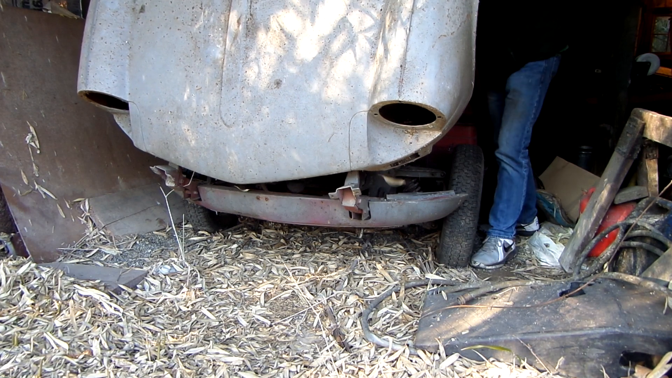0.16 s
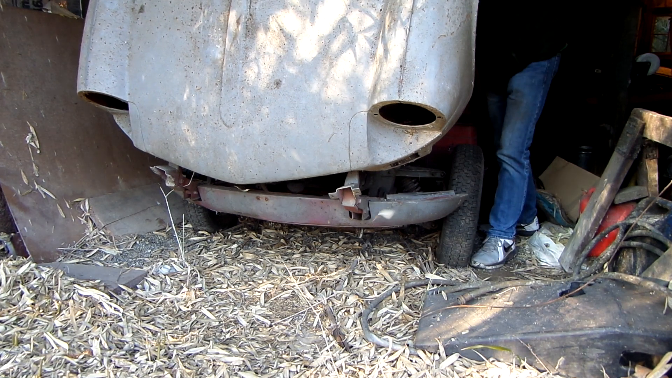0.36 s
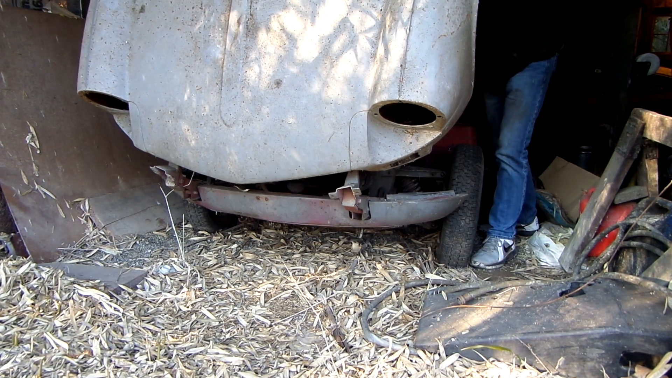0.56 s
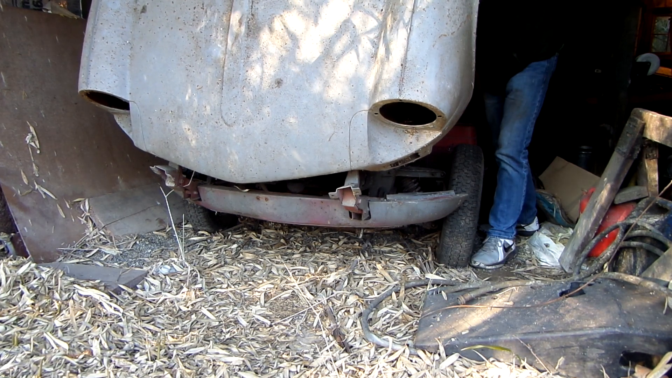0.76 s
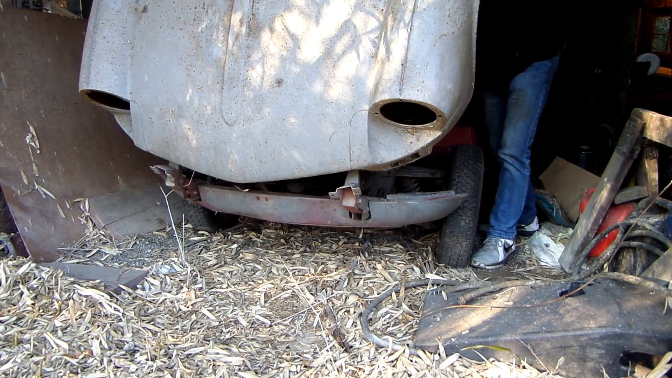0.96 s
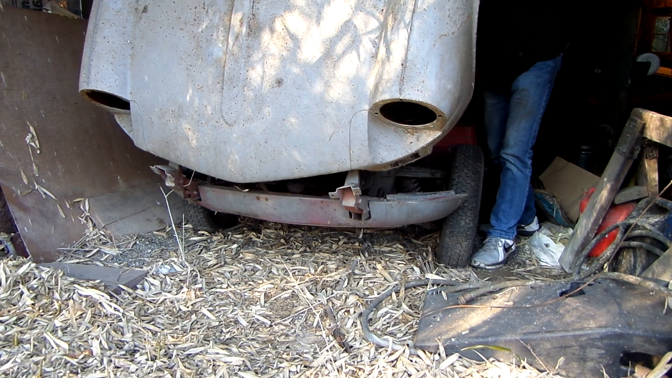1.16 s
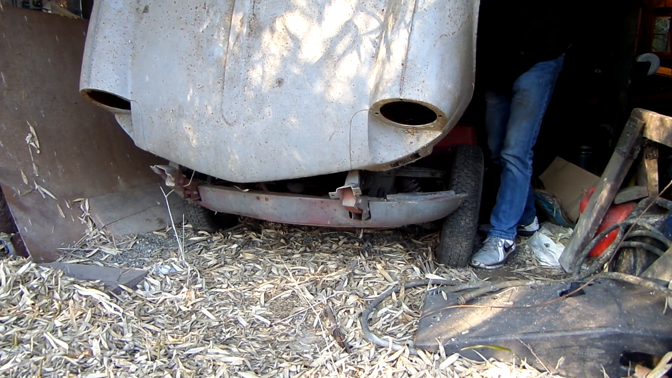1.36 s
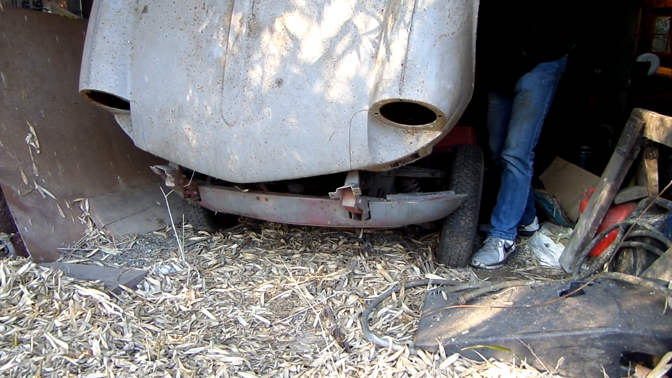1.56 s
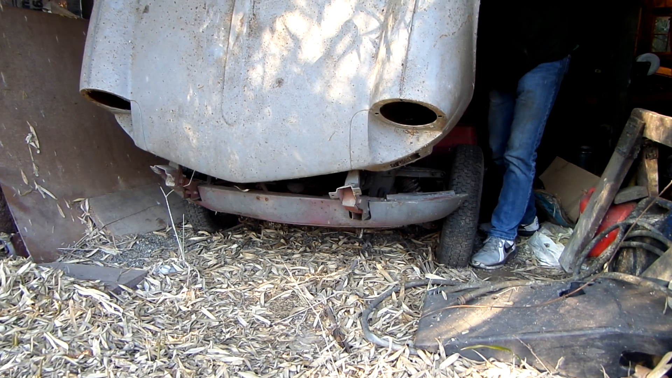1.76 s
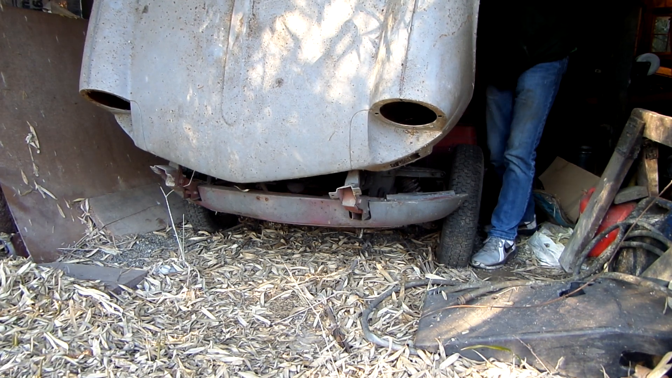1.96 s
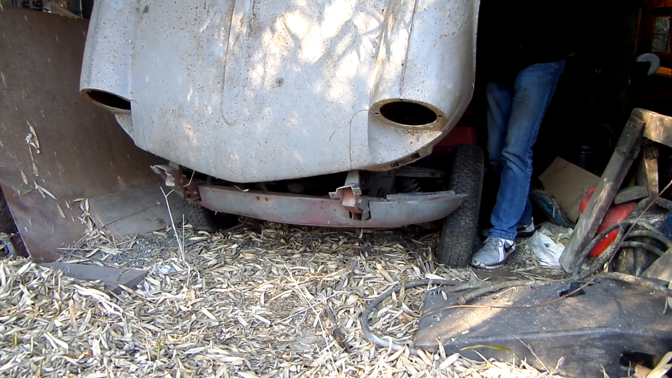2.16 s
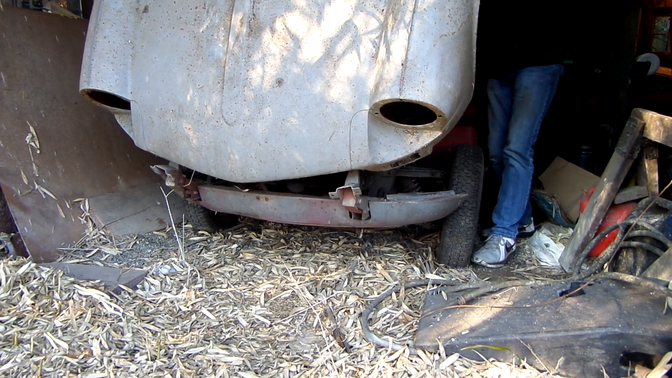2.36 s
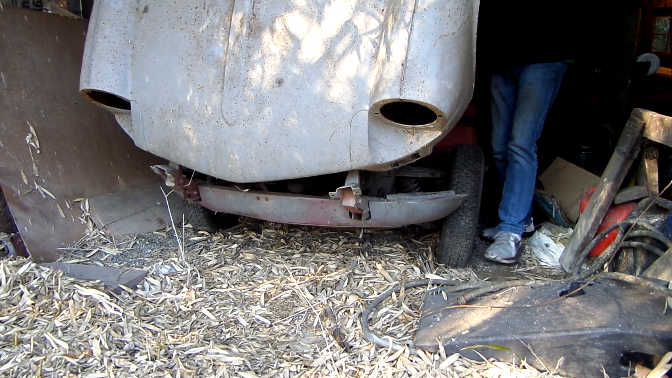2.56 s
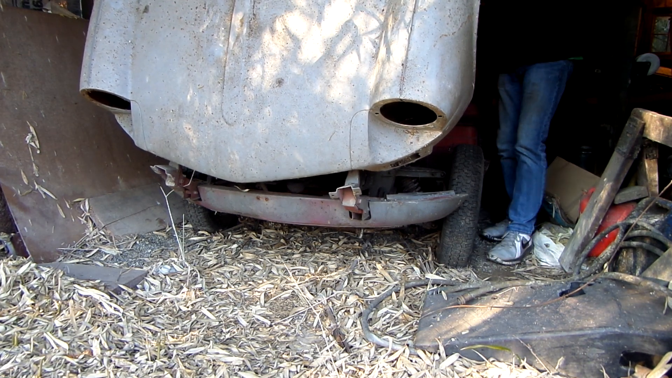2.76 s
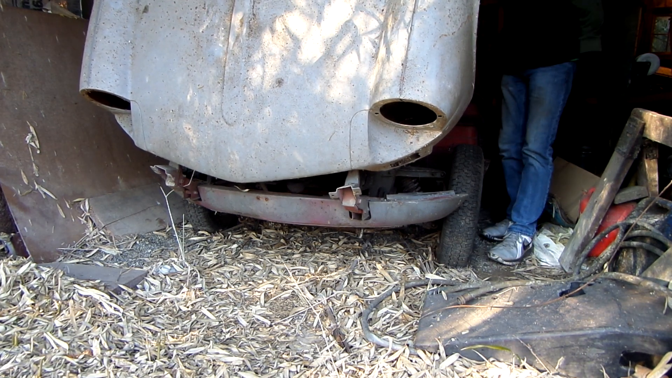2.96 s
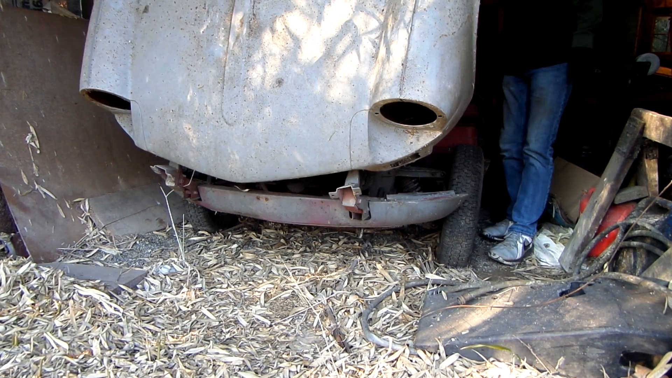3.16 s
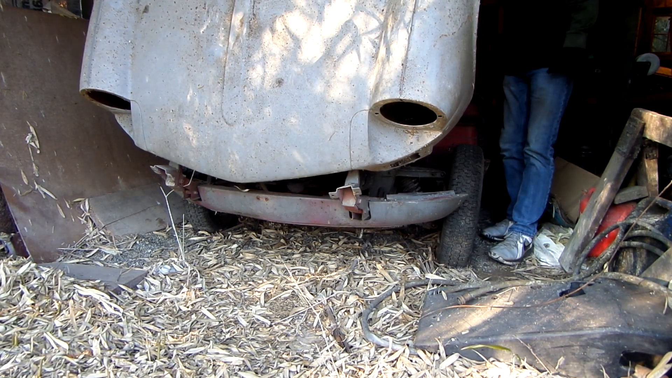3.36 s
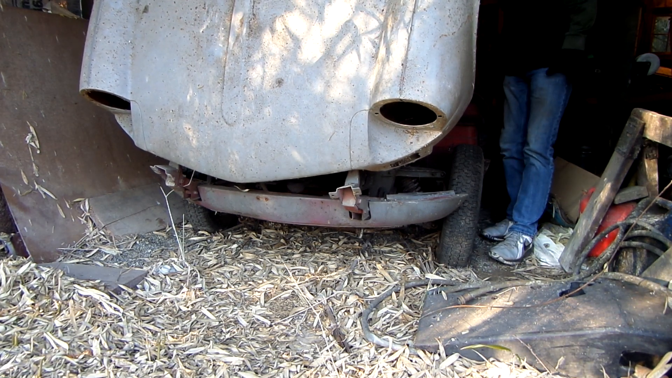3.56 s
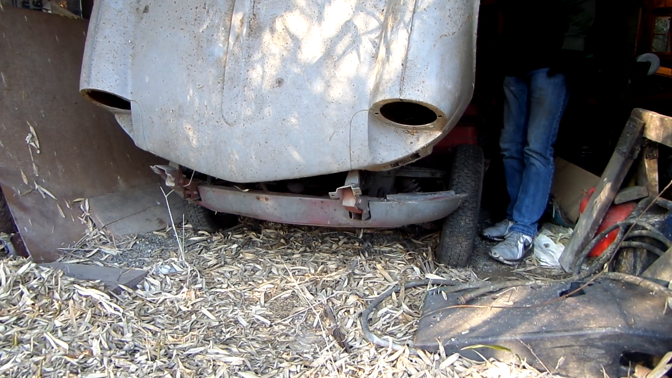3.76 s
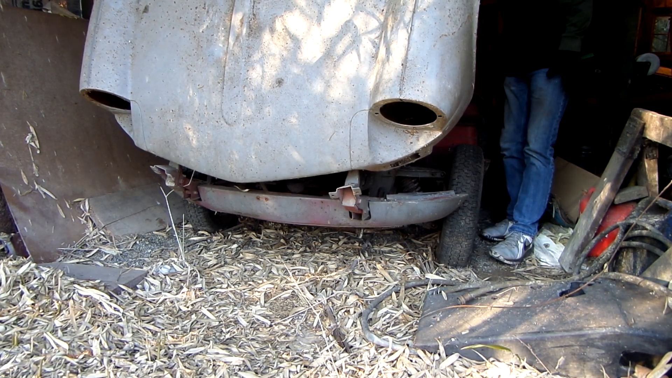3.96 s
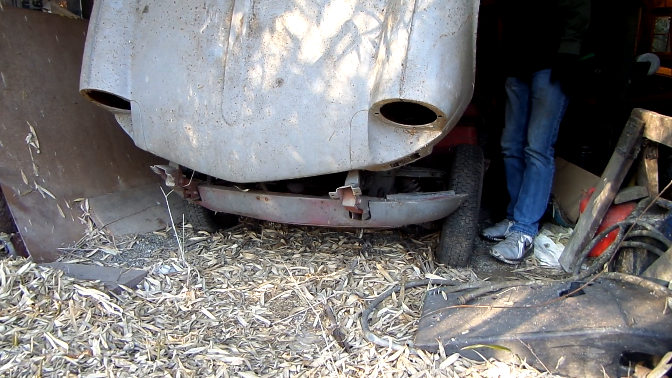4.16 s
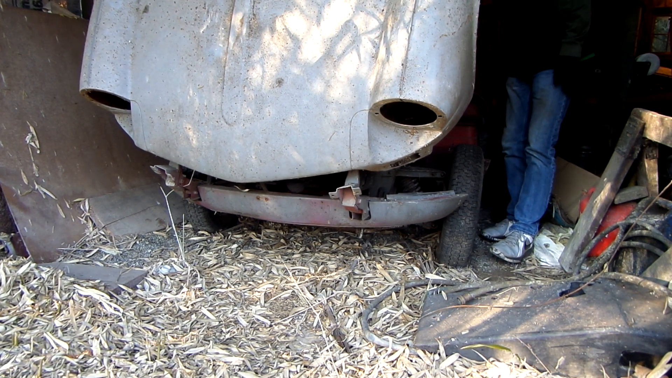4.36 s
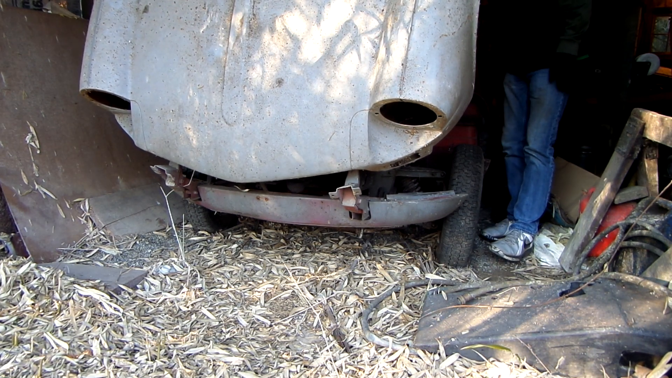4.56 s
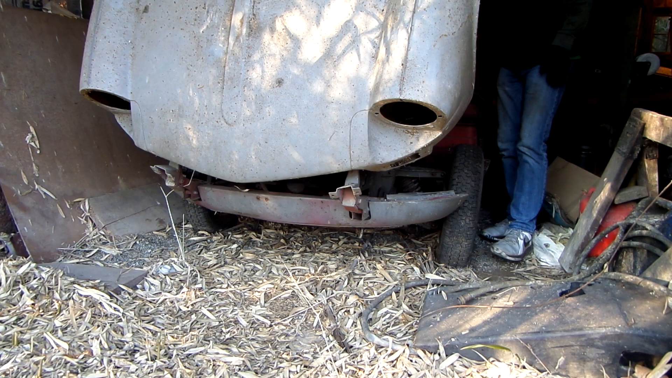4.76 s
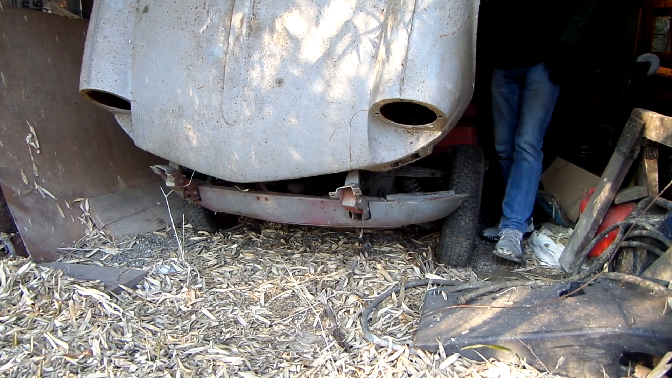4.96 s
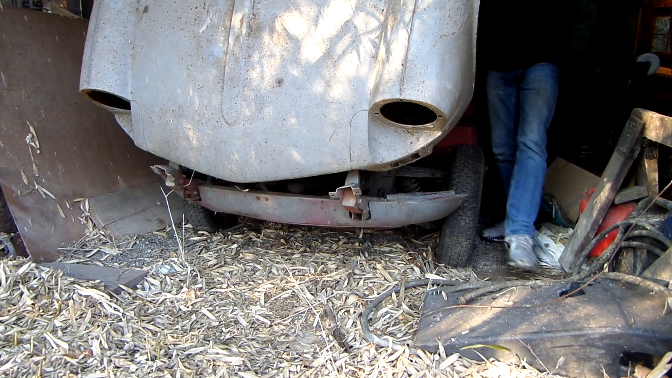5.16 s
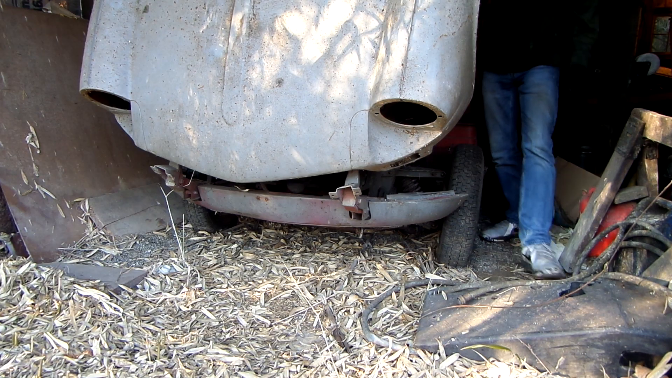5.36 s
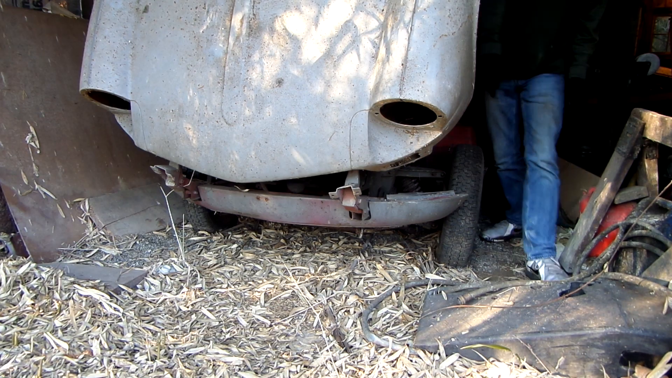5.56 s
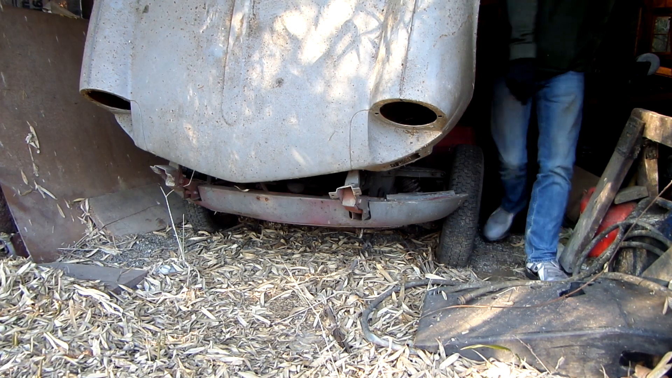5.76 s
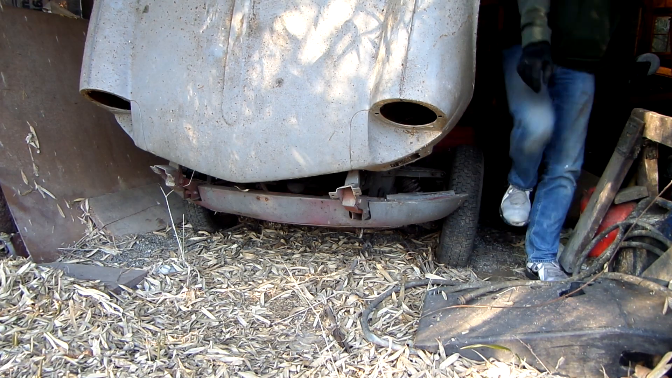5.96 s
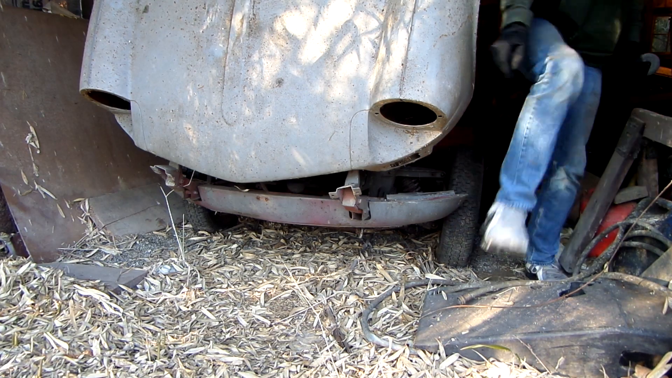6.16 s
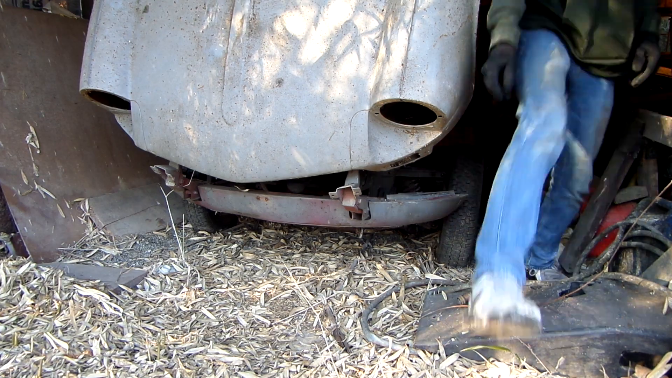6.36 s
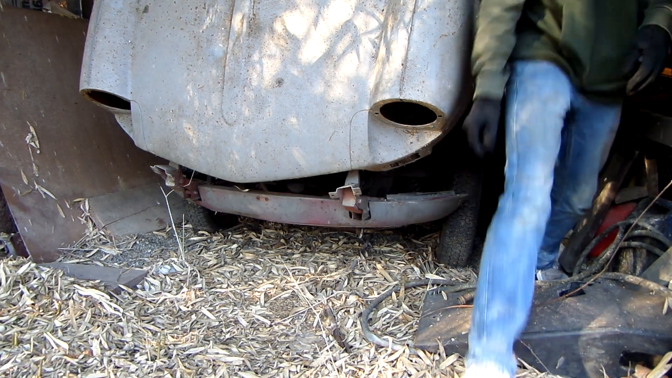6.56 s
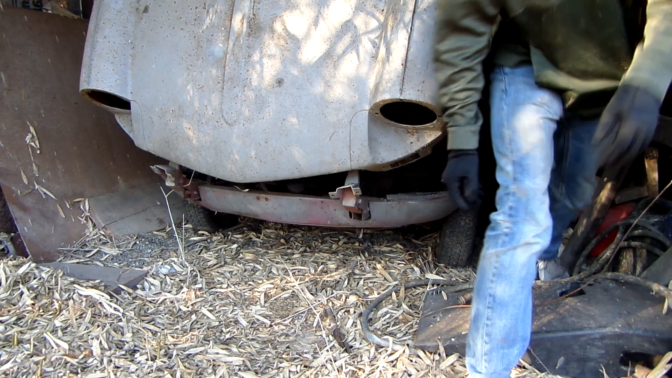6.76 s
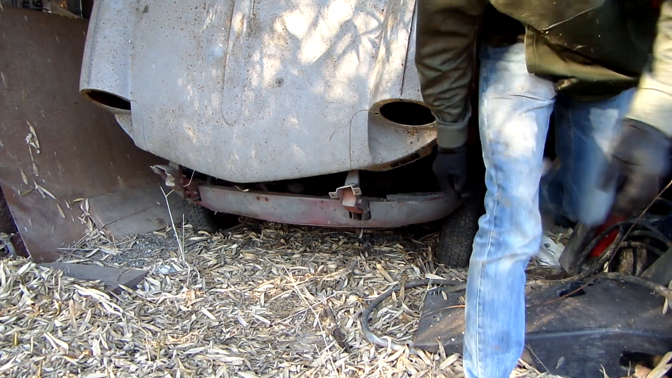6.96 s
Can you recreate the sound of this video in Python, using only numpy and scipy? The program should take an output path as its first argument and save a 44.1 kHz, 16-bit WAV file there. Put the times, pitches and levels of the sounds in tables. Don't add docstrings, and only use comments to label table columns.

```python
import sys
import numpy as np
from scipy import signal
from scipy.fft import rfft, irfft, next_fast_len
from scipy.io import wavfile
from scipy.ndimage import uniform_filter1d

SR = 44100
rng = np.random.default_rng(int(sys.argv[2]) if len(sys.argv) > 2 else 0)


def elevation(decibels):
    levels = np.asarray(decibels, float)
    return 10 ** (levels / 20)


def transcribe(u):
    v = np.clip(np.atleast_2d(u).T, -1, 1)
    q = np.round(v * 32767).astype(np.int16)
    wavfile.write(sys.argv[1], SR, q)


N = 312889


def rms_one(x):
    return x / np.sqrt(np.mean(x ** 2) + 1e-20)


def in_time(rows):
    s, *columns = np.transpose(rows)
    return [np.interp(np.arange(N) / SR, s, c) for c in columns]


def band(x, low_hz, high_hz, order=2):
    edges = np.clip([low_hz, high_hz], 10, .45 * SR)
    return signal.sosfilt(signal.butter(order, edges, "band", fs=SR, output="sos"), x)


def colour(x, spectrum):
    hz, db = np.transpose(spectrum)
    size = next_fast_len(N, real=True)
    grid = np.maximum(np.arange(size // 2 + 1) * SR / size, 1)
    gain = elevation(np.interp(np.log(grid), np.log(hz), db))
    return rms_one(irfft(rfft(x, size) * gain, size)[:N])


def drift(rate_hz):
    r = np.exp(-2 * np.pi * rate_hz / SR)
    wander = signal.lfilter([1], [1, -2 * r, r * r], rng.standard_normal(N + SR))
    return rms_one(wander[SR:])


def dying(t60, size):
    return rng.standard_normal(size) * elevation(-60 * np.arange(size) / SR / max(t60, .001))


def add(out, s, burst, peak_db):
    i = round(s * SR)
    out[i:i + len(burst)] += (burst * elevation(peak_db) / np.abs(burst).max())[:N - i]


def grains(per_s, spread_db, t60, clump_db, bed_db):
    born = rng.random(N) < per_s * elevation(clump_db * drift(25)) / SR
    sizes = elevation(spread_db * np.minimum(rng.exponential(1, N), 4)) * born
    power = signal.lfilter([1], [1, -elevation(-120 / (t60 * SR))], sizes ** 2 + 1e-18)
    return rng.standard_normal(N) * np.sqrt(power / power.mean() + elevation(2 * bed_db))


def tread():
    # time in seconds, stirring of the leaves in dB, pressure of the soles in dB
    steps = [(0.0, -47, -57), (0.28, -46.5, -61.5), (0.38, -44, -59), (0.5, -56.5, -63.5),
             (0.86, -60.5, -64.5), (1.12, -56.5, -63), (1.42, -64, -64.5), (2.6, -66.5, -62.5),
             (2.78, -51, -57.5), (2.88, -64.5, -64.5), (4.24, -69.5, -65.5), (4.5, -62.5, -61),
             (4.8, -68, -64.5), (5.57, -63, -63), (6.4, -61.5, -62.5), (6.43, -48, -49.5),
             (6.66, -55.5, -63), (7.09, -60.5, -63.5)]
    # pitch in Hz, strength in dB per Hz
    rustle = [(4120, -36), (7000, -15.5), (15100, -2), (16000, 11.5), (16500, -12)]
    crunch = [(2500, -30), (4000, 0), (9000, -3.5), (12000, -18.5)]
    scuff = [(500, -7), (900, -6.5), (2400, -8), (3500, -16), (5500, -27)]
    weight = [(80, -39), (150, 1), (430, -1.5), (900, -2.5), (1500, -15.5)]
    stir_db, press_db = in_time(steps)
    crunch_db = -68 + 0.58 * (stir_db + 64.5)
    weight_db = -63 + 0.43 * (press_db + 64)
    levels = (stir_db, crunch_db, press_db, weight_db)
    layers = (colour(grains(per_s=250.0, spread_db=4.0, t60=0.006, clump_db=6.0, bed_db=3.5), rustle),
              colour(grains(per_s=780.0, spread_db=1.0, t60=0.036, clump_db=-4.0, bed_db=-4.5), crunch),
              colour(grains(per_s=380.0, spread_db=2.5, t60=.03, clump_db=1.5, bed_db=-1.2), scuff),
              colour(grains(per_s=200.0, spread_db=4.5, t60=0.032, clump_db=-0.5, bed_db=-2.0), weight))
    still_db, lift_db = (-68, -68.5, -65, -63.0), (4.0, 0.0, -0.1, 3.0)
    out = np.zeros(N)
    for layer, db, still, lift in zip(layers, levels, still_db, lift_db):
        loudness = np.sqrt(np.maximum(elevation(2 * db) - elevation(2 * still), 0))
        out += layer * elevation(lift) * loudness
    return out


def air():
    # pitch in Hz, strength in dB per Hz
    air_colour = [(12, -54), (20, -15.5), (70, 1.5), (126, 1), (220, -6), (283, -7.5), (508, -11),
                  (1310, -17), (1590, -17.5), (1890, -19), (6610, -23.5), (14400, -26.5), (15700, -19.5)]
    # pitch in Hz, level in dB
    whine_tones = [(14906, -84)]
    still = colour(rng.standard_normal(N), air_colour)
    swell = band(still, 37, 190) * (elevation(0.55 * drift(0.84)) - 1)
    hum = elevation(-74) * rms_one(band(rng.standard_normal(N), 195, 222))
    whine = np.zeros(N)
    for hz, db in whine_tones:
        whine += elevation(db) * rms_one(band(rng.standard_normal(N), hz - 30, hz + 30))
    whine *= elevation(1.9 * drift(1.4))
    return elevation(-62.2) * (still + swell) + hum + whine


def drags():
    # middle in seconds, half length in seconds,
    # level in dB, lowest pitch in Hz, highest pitch in Hz
    scrapes = [(0.135, 0.06, -54.5, 1000, 4900), (1.206, 0.043, -63, 200, 1500),
               (1.736, 0.041, -61.5, 200, 1300), (1.97, 0.04, -56.5, 400, 1530),
               (2.439, 0.041, -53, 200, 600), (2.449, 0.045, -45.5, 680, 2840),
               (2.53, 0.058, -56, 250, 2360), (2.653, 0.033, -54, 590, 3600),
               (2.738, 0.039, -59.5, 300, 2440), (4.72, 0.059, -62, 700, 2200),
               (5.526, 0.033, -43, 150, 300), (5.673, 0.021, -56, 700, 1300)]
    # middle in seconds,
    # half length in seconds, level in dB, lowest pitch in Hz
    sweeps = [(.16, .023, -53, 8000), (0.227, .012, -54, 6000), (0.36, .013, -53, 9100),
              (1.972, 0.051, -58.5, 3020), (2.374, .094, -56.5, 1480), (2.433, 0.02, -44.5, 5000),
              (2.648, 0.028, -42, 3460), (2.74, .03, -52, 2470), (4.297, .01, -57.5, 3500),
              (4.7, 0.071, -55, 3020), (4.718, .01, -53, 5000), (5.466, 0.034, -52, 1190),
              (5.536, 0.032, -58, 5000), (5.66, 0.052, -59, 4000), (6.035, .086, -61.5, 5000),
              (6.583, 0.048, -47, 990), (6.857, .032, -51.5, 1990), (6.945, 0.088, -55.5, 2880)]
    sweep_top_hz = 17200
    out = np.zeros(N)
    grit = grains(per_s=500.0, spread_db=2.5, t60=.012, clump_db=1.5, bed_db=1.5)
    for s, half, level_db, low_hz, high_hz in scrapes + [(*row, sweep_top_hz) for row in sweeps]:
        span = slice(max(round((s - 3 * half) * SR), 0), round((s + 3 * half) * SR))
        time = (span.start + np.arange(len(grit[span]))) / SR
        speed = np.exp(-((time - s) / half) ** 2)
        out[span] += elevation(level_db) * speed * rms_one(band(grit[span], low_hz, high_hz, order=3))
    return out


def snaps():
    # time in seconds, peak in dB, body
    # below its top in dB, scattered sound in dB
    leaf_breaks = [(0.0298, -26.5, -16, -11), (0.0444, -36, -21, -12), (0.0936, -26.5, -21, -7.5),
                   (0.101, -26.5, -13.5, -11), (0.105, -20.5, -18, -9), (0.1257, -27, -23, -14),
                   (0.1506, -27, -21, -5), (0.1608, -27, -18, -10.5), (0.2154, -36, -21, -12),
                   (0.2154, -29, -18, -1), (0.2495, -30, -7, -13), (0.2902, -23.5, -18, -10.5),
                   (0.3164, -25, -21, -11), (0.3295, -33, -27, -9), (0.348, -27, -21, -22),
                   (0.354, -36, -13, -15), (0.3604, -34.5, 0, -7), (0.4, -36, -21, -21),
                   (0.4404, -28.5, -17, -7.5), (0.4589, -28.5, -18, -6), (0.4944, -33, -28, -12),
                   (0.5426, -25, -30, -15), (0.5475, -20.5, -22.5, -13.5), (0.62, -39, -28, 2),
                   (0.703, -32.5, -25, -8), (0.831, -29.5, -22, -9), (0.911, -30.5, -20, -2),
                   (1.1657, -27.5, -25, -10.5), (1.3505, -38, -21, -11), (1.386, -41, -25, -14),
                   (1.6087, -29.5, -23, -15), (2.391, -44, 1, -4), (2.4224, -21.5, -4.5, -9.5),
              (2.434, -32, 1, -2), (2.443, -34, -7, -10), (2.6229, -24.5, -28, -7.5),
              (2.65, -19.5, -32, -12), (2.6826, -28.5, -16.5, -6), (2.7156, -25, -20, -10),
              (2.724, -22, -31, -10), (2.7444, -28.5, -22, -9), (2.8113, -34, -16, -14),
              (2.8316, -32, -12.5, -12.5), (2.8816, -40.5, -12, -5), (3.122, -40, -18, -9),
              (3.3942, -43, -18, -15), (3.4186, -40, -20, -10), (3.471, -40, -13.5, -13),
              (3.5359, -44, -18, -16), (3.7272, -40.5, -20, -18),
                   (3.9796, -34.5, -13, -10), (4.2123, -27.5, -21, -16), (4.2797, -43, -16, -14),
             (4.3001, -32.5, -18, -12), (4.3296, -37, -20, -14), (4.3434, -40, -16, -11),
             (4.372, -27, -23, -17), (4.4107, -37, -14, -9), (4.4543, -42, -10, -10),
             (4.4747, -38, -11, -19), (4.5326, -30.5, -12.5, -17), (4.6686, -33, -16, -14),
             (4.6737, -31.5, -12, -12), (4.6937, -31, -15, -12), (4.7127, -26.5, -19, -12),
             (4.7393, -33, -17, -17), (5.6022, -41, -11, -4), (5.6351, -36, -11, -8),
             (5.9564, -42.5, -3, -8), (6.2103, -37, -8, -19), (6.2387, -33.5, -14, -17),
             (6.357, -42, -10, -5), (6.5829, -17.5, -13.5, -13), (6.712, -41, -9, -8),
             (6.7565, -33, -9, -10.5), (6.8558, -31, -12, -12), (6.9496, -33.5, -13, -19),
             (6.9664, -40, -23, -22.5)]
    leaf_hz = 13860
    out = np.zeros(N)
    for s, peak_db, body_db, tail_db in leaf_breaks:
        t60 = 0.14 + 0.0064 * (tail_db + 13)
        burst = dying(0.0035, size=6000) + elevation(tail_db - 4) * dying(t60, size=6000)
        top = band(burst, leaf_hz / 1.27, leaf_hz * 1.405, order=3)
        top = top + 0.82 * band(burst, 7430, 18400, order=3)
        body = elevation(body_db + 13) * band(burst, 2690, 7300, order=3)
        add(out, s + 0.00083, top + body, peak_db + 0.02)
    return out


def knocks():
    # time in seconds, peak in dB, centre in Hz, clack below the peak in dB
    dull_rows = [(0.726, -37, 1000, -9), (1.191, -40, 247, 9), (1.462, -43, 1040, -13),
                 (1.649, -30.5, 1030, -3), (1.935, -34.5, 185, -21), (1.944, -37, 187, -24),
                 (2.145, -46, 915, -16), (2.393, -34.5, 1690, -20), (2.423, -27, 2310, -21),
                 (2.445, -27.5, 1700, -12), (2.488, -38.5, 415, -9), (2.548, -40.5, 272, -23),
                 (5.402, -33, 310, -24), (5.416, -39, 261, -16), (5.505, -21, 293, -7),
                 (5.506, -28.5, 1030, -12), (5.521, -23.5, 410, -32), (5.583, -39.5, 240, 14),
                 (5.641, -35, 435, -10), (6.529, -39.5, 229, -19)]
    # time in seconds, peak in dB,
    # centre in Hz, time to die by 60 dB in seconds
    hard_rows = [(0.0316, -29, 11100, .012), (0.1014, -25, 13000, .02), (0.2893, -29.5, 9000, .02),
                 (0.3478, -14.5, 13400, .013), (0.3554, -17.5, 13100, .013), (0.4594, -28, 13400, .015),
                 (0.5478, -33, 12000, .012), (1.6486, -28.5, 2760, .05), (3.981, -45.5, 3500, .05),
                 (4.2997, -44, 5000, .04), (4.3724, -40.5, 5960, .03), (4.4104, -36, 13100, .015),
                 (5.6072, -39, 845, .08), (5.6232, -36, 900, .1), (5.6352, -30, 954, 0.084),
                 (6.24, -40, 3640, .068), (6.5822, -30.5, 1610, .049), (6.7572, -39, 4500, .07),
                 (6.7575, -41, 1400, .05), (6.8572, -47, 260, 0.092), (6.8916, -45, 1296, 0.032),
                 (6.918, -52, 972, 0.045)]
    # time in seconds, peak in dB,
    # centre in Hz, clack below the peak in dB
    heel_rows = [
        (1.589, -43.5, 869, -8),
        (4.77, -40.5, 950, -10),
        (6.423, -30, 396, -20),
        (6.583, -31.5, 230, -8),
        (6.5835, -27.5, 900, -11),
        (6.855, -28, 483, -8),
        (6.8549, -36.5, 1090, -10),
    ]
    dull = [(s, db, hz, 0.18, 1.4 + .015 * (db + 47), edge)
            for s, db, hz, edge in dull_rows]
    hard = [(*row, 0.62, -5) for row in hard_rows]
    near = [(s, db, hz, 0.042, 1.67, edge) for s, db, hz, edge in heel_rows]
    out = np.zeros(N)
    for s, peak_db, hz, t60, octaves, clack_db in dull + hard + near:
        burst = 0.32 * dying(t60, size=8000) + dying(0.01, size=8000) + 0.057 * dying(0.37, size=8000)
        spread = 2 ** np.clip(octaves, .1, 1.7)
        body = band(burst, hz / spread ** 0.085, hz * spread ** 0.11, order=1)
        rough = 0.23 * band(burst, hz / spread, hz * spread, order=3)
        add(out, s, body + rough, peak_db - 4.0)
        add(out, s + 0.000926, band(burst, 1500, 3570, order=3), peak_db + clack_db - 19.5)
    return out


def chimes():
    # time in seconds, pitch in Hz, peak in dB, time to die by 60 dB in seconds
    rings = [
        (.912, 7700, -60, .5),
        (3.985, 7300, -66, .5),
    ]
    out = np.zeros(N)
    for s, hz, peak_db, t60 in rings:
        add(out, s, band(dying(t60, size=12000), hz - 110, hz + 110), peak_db)
    return out


def crack():
    # pitch in Hz, strength in dB per Hz
    pod_colour = [(88, -49), (150, -18), (409, -3), (2130, -6), (3560, -3.5), (4420, -2), (11800, -1),
                  (15600, -4.5), (16500, -28)]
    pod_s, peak_db = 6.4203, 0
    out = np.zeros(N)
    tearing = rng.standard_normal(12000) * np.exp(-(np.arange(12000) / SR / 0.0037) ** 3)
    scatter = 0.2 * dying(0.14, size=12000) + 0.027 * dying(0.63, size=12000)
    add(out, pod_s, tearing + scatter, 0)
    add(out, pod_s - .004, dying(.2, size=170), -24)
    out = colour(out, pod_colour)
    return elevation(peak_db) * out / np.abs(out).max()


def starve(x):
    # start in seconds, end in seconds, lowest lost pitch in Hz, highest lost pitch in Hz
    dropouts = [
        (.331, .346, 900, 2200),
        (.342, .346, 3000, 9000),
        (.538, .542, 4000, 9000),
        (.552, .558, 1200, 3000),
        (2.409, 2.419, 6500, 19000),
        (2.611, 2.621, 2300, 19000),
        (6.4, 6.4155, 700, 19000),
        (6.75, 6.754, 5000, 8000),
    ]
    out = x.copy()
    for start, end, low_hz, high_hz in dropouts:
        span = slice(round(start * SR) - 500, round(end * SR) + 500)
        time = np.arange(span.start, span.stop) / SR
        inside = np.abs(time - (start + end) / 2) < (end - start) / 2
        gap = uniform_filter1d(1. * inside, size=64)
        part = out[:, span]
        stop = signal.butter(4, [low_hz, high_hz], "bandstop", fs=SR, output="sos")
        dull = signal.sosfiltfilt(stop, part * uniform_filter1d(gap, size=64))
        out[:, span] = part * (1 - .97 * gap) + dull
    return out


def scene():
    # time in seconds, gain in dB
    gain_rows = [
        (0, 6),
        (6.42, 4.5),
        (6.45, -8),
        (6.7, -0.5),
        (7.09, -2),
    ]
    gain_db, = in_time(gain_rows)
    background = elevation(gain_db) * air()
    return (background + tread() + drags() + snaps() + knocks() + chimes() + crack())[None]


def roll_off(x):
    return signal.sosfilt(signal.butter(12, 16840, fs=SR, output="sos"), x)


def record(dry):
    cut_hz = 15850
    dry = .64 * np.tanh(starve(dry) / .64)
    low = signal.sosfilt(signal.cheby2(16, 60, cut_hz + 200, fs=SR, output="sos"), dry)
    top = band(dry, cut_hz, cut_hz + 900)
    sudden = uniform_filter1d(top ** 2, size=128) > 7.0 * uniform_filter1d(top ** 2, size=2048)
    opening = uniform_filter1d(1. * sudden, size=128)
    return roll_off(low + elevation(-14) * top * opening)


dry = scene()
out = record(dry)
transcribe(out)
```